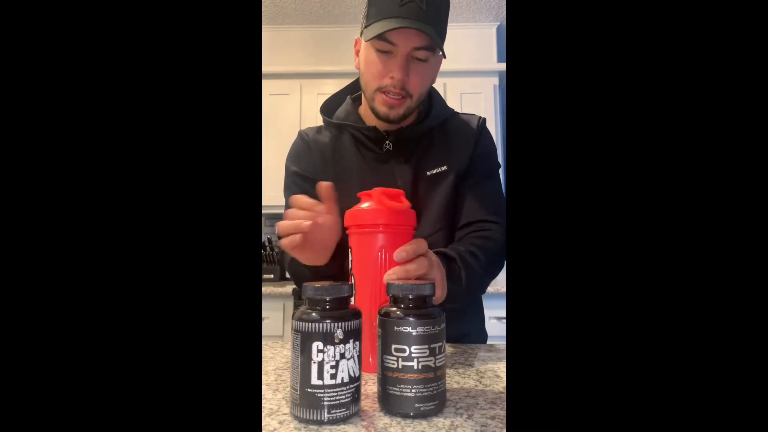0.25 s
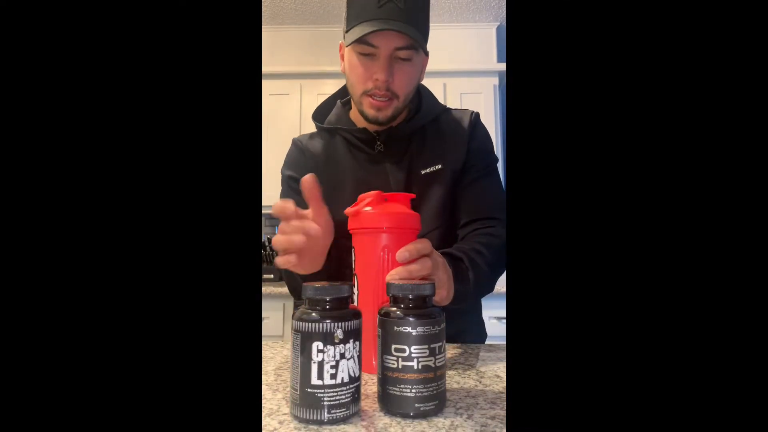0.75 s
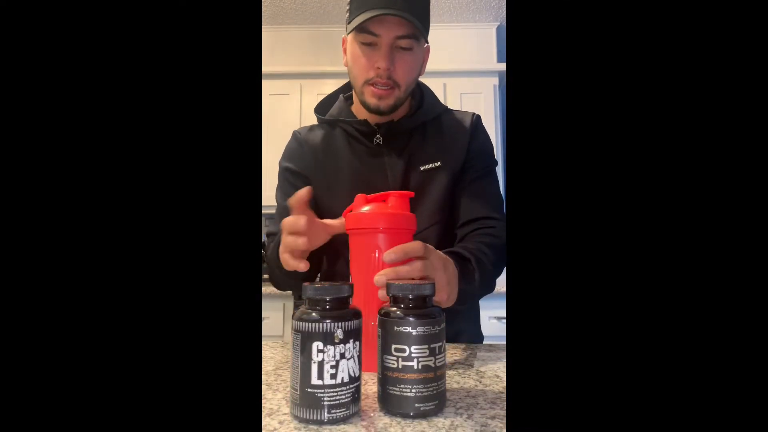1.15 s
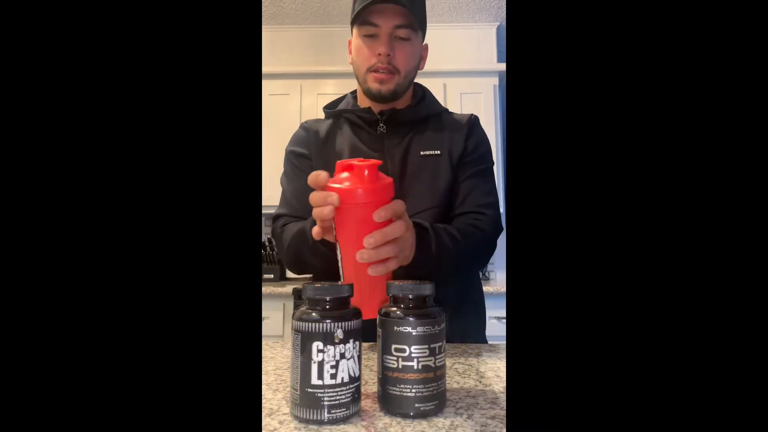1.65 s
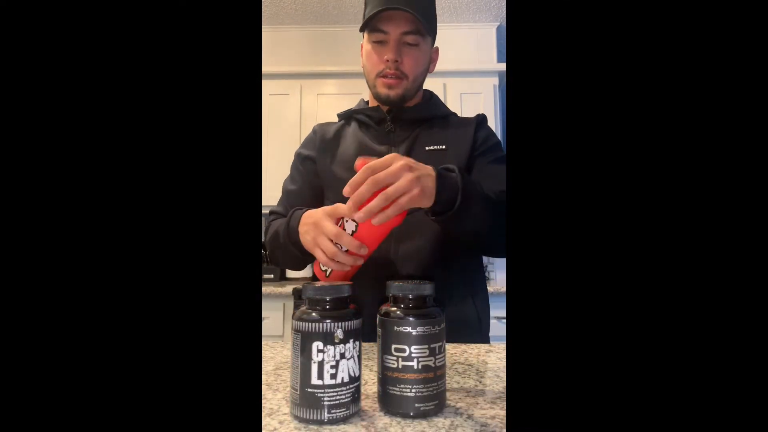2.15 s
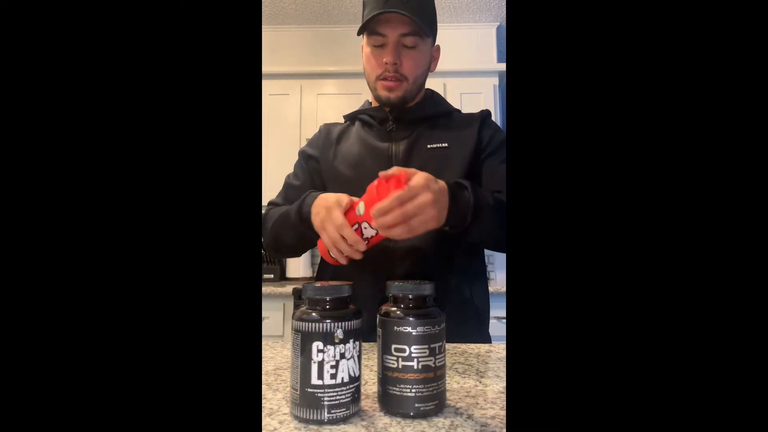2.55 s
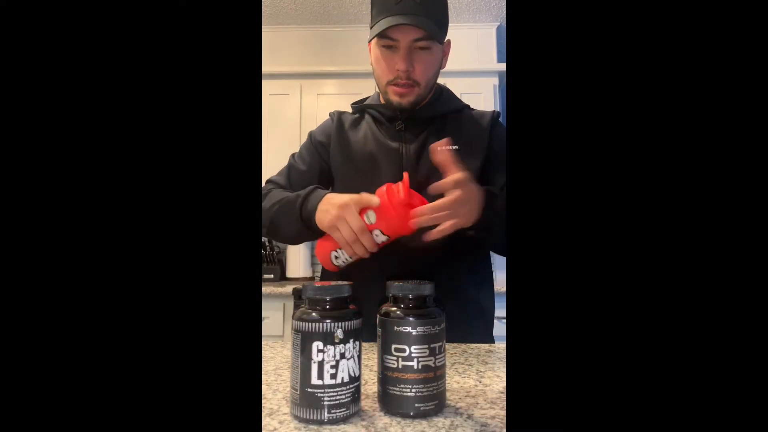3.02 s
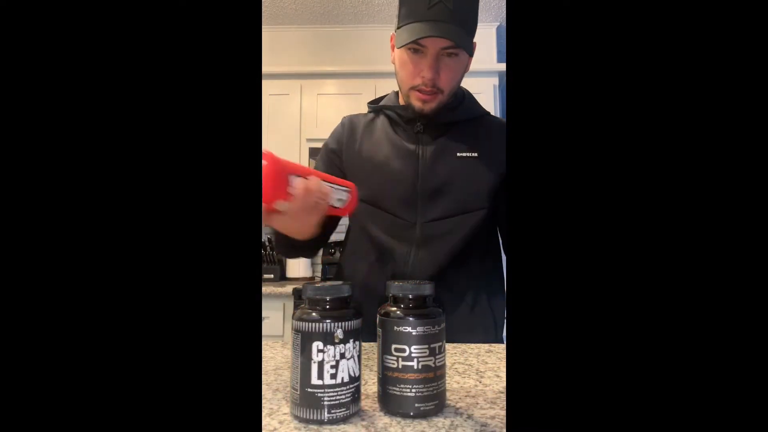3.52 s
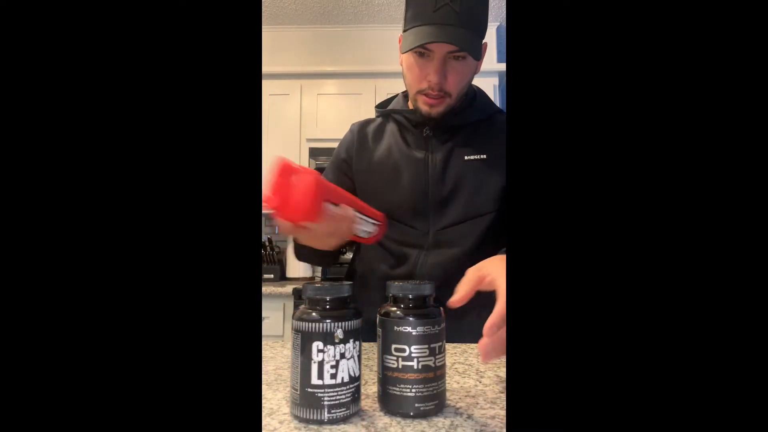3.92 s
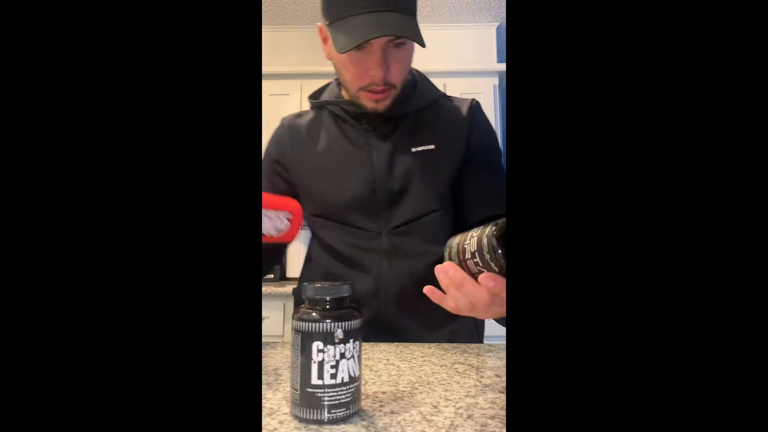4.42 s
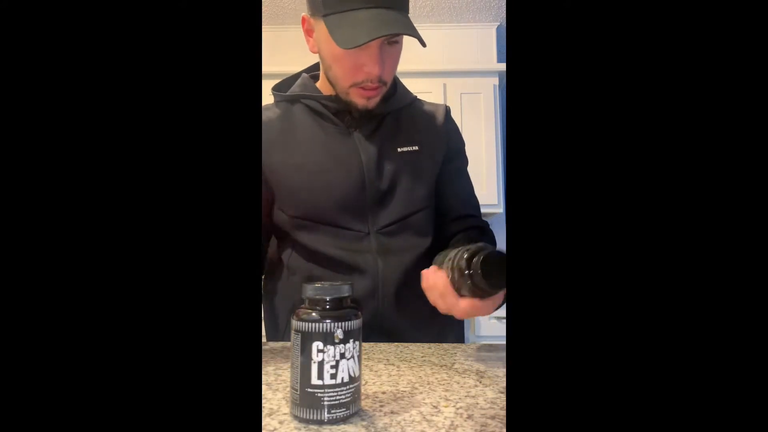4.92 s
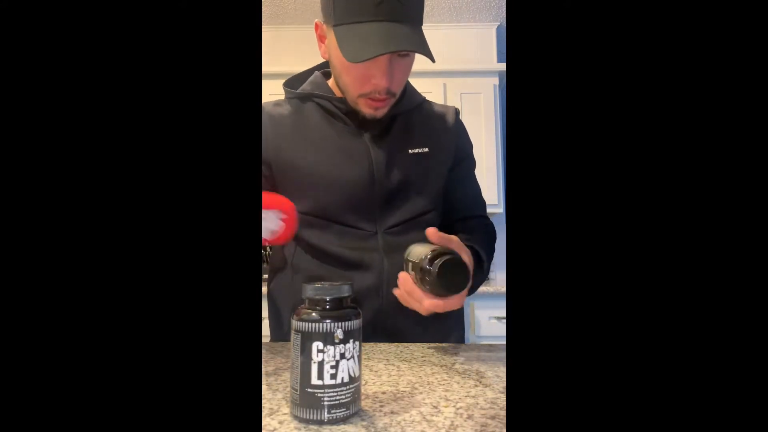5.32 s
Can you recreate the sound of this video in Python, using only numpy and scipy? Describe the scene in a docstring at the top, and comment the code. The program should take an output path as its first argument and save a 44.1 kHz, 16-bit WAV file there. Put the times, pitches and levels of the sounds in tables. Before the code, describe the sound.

In a small kitchen, a plastic cup's lid clicks shut, hands handle it quietly, then it is shaken with watery slosh and sharp rattling knocks.

```python
"""A plastic shaker bottle in a small kitchen, an arm's length from a two-port microphone.
Its lid snaps shut on the counter, fingers tap and hands slide on it, and the cap is pressed once more.
Then it is shaken: water and powder slosh, and something hard, likely the mixing ball, rattles.
Lid, taps and ball are bursts of contacts ringing through plastic resonances; thuds are damped tones.
The liquid is random splashes, bubbles and spray; a fridge hums throughout as shaped noise and tones."""
import sys
import numpy as np
from scipy import signal
from scipy.fft import rfft, irfft, next_fast_len
from scipy.io import wavfile
from scipy.ndimage import uniform_filter1d

SR = 44100
rng = np.random.default_rng(int(sys.argv[2]) if len(sys.argv) > 2 else 0)


def dump(signal):
    """Clip the signal to [-1, 1] and save it as 16-bit WAV at the path in sys.argv[1]."""
    limited = np.clip(np.atleast_2d(signal).T, -1, 1)
    pcm = np.round(limited * 32767).astype(np.int16)
    wavfile.write(sys.argv[1], SR, pcm)


N = 245530

# Levels in the tables are relative: the functions that use them may trim them.
# The ball hitting the cup; rebound_s is the time to its rebound, 0 if it stays:
# start_s, strength_db, hollow_db, tick_db, spot_hz, chatter_s, rebound_s
BALL_KNOCKS = [(3.4179, -21, -37, -29, 1600, 0.0065, 0.002),
               (3.461, -7.5, -28.5, -20, 2700, 0.0063, 0.0039),
               (3.494, -19.5, -37, -17.5, 2350, 0.0061, 0.0025),
               (3.5488, -16, -26.5, -25, 2000, 0.0075, 0.009), (3.661, -11, -24.5, -17, 2880, .012, 0.02),
               (3.7645, -26, -32, -42, 2278, .006, 0.00099), (3.8078, -7, -18, -16, 2400, 0.01, 0.0037),
               (3.882, -14, -35, -21.5, 1780, 0.0095, 0.00017),
               (3.9409, -14, -25, -17.5, 1950, 0.0088, .0065), (3.957, -13, -42, -21, 2370, 0.0074, 0.001),
               (3.982, -18, -49, -44, 2410, 0.0025, 0), (4.012, -20.5, -36, -18.5, 3080, 0.0055, 0),
               (4.1074, -12, -24, -27, 3156, .004, .01), (4.1307, -17, -29, -21.5, 1830, 0.0058, 0),
               (4.1835, -23.5, -55, -36, 2300, 0.0031, 0), (4.2639, -20, -48, -20, 2340, 0.0022, 0.0029),
               (4.3269, -21.5, -38, -21, 1573, 0.0075, 0.016), (4.4101, -21, -33, -26.5, 1774, 0.0074, 0),
               (4.4451, -23, -39, -29, 1720, 0.0035, 0.007),
               (4.5874, -12.5, -28, -20.5, 2550, 0.0079, 0.006),
               (4.6352, -14.5, -24.5, -17, 2350, 0.0068, 0.0096),
               (4.6835, -17, -34, -21.5, 1700, 0.0052, 0), (4.7152, -20, -28.5, -22.5, 1640, 0.0049, 0),
               (4.7407, -12, -22, -20, 3000, 0.0052, .021), (4.8675, -7.5, -27, -10, 2660, 0.0056, 0.0033),
               (4.883, -13.5, -53, -17.5, 2656, .005, 0.0031), (4.9254, -15, -35, -12.5, 1980, .005, 0.003),
               (5.0134, -30, -32, -32, 1816, 0.0043, 0.003), (5.0404, -22, -29, -31, 1590, 0.0059, 0),
               (5.1632, -5, -26, -13.5, 2647, 0.011, 0.0034), (5.2128, -23, -54, -22, 2187, 0.0051, 0),
               (5.3139, -3.5, -19.5, -14, 3280, 0.0026, 0), (5.3178, -8.5, -21, -20, 1716, .003, 0),
               (5.4764, -9, -30.5, -10.5, 1800, 0.0086, 0.01), (5.5466, -15.5, -28, -17.5, 1593, 0.0021, 0)]
# Resonances of the swung cup, against its broad response: pitch_hz, width_hz, level_db
CUP_RESONANCES = [(486, 18, 8), (1150, 79, -7.5), (1790, 300, -2), (2360, 60, -2.5), (2364, 160, 9),
                  (2710, 120, 4.5), (3090, 170, 7), (4120, 440, 8.5)]
# Spectrum of a bright tick: frequency_hz, level_db
TICK_SPECTRUM = [(3000, -16.5), (4700, 10), (6000, 6), (7200, 5.5), (8200, 5), (10500, 3), (13000, 1.5),
                 (15200, 8), (16000, -3)]

LEAD_S = 0.02  # a strike begins this long before its hard contact
SHAKE_START_S = 3.28


def gain_of(db):
    """Decibels to amplitude."""
    return 10 ** (np.asarray(db) / 20)


def evened(x):
    """Scales to unit rms."""
    return x / np.sqrt(np.mean(x ** 2) + 1e-20)


def read(points, hz):
    """Reads a table on a log-frequency axis."""
    f, value = np.transpose(points)
    return np.interp(np.log(hz + 1), np.log(f + 1), value)


def level(rows):
    """A (second, dB) curve as a gain for every sample."""
    seconds, db = np.transpose(rows)
    return gain_of(np.interp(np.arange(N) / SR, seconds, db))


def add(mix, s, sound):
    """Mixes a sound in at time s."""
    part = mix[max(round(s * SR), 0):][:len(sound)]
    part += sound[:len(part)]


def band(x, lo_hz, hi_hz, order=3):
    """Causal band-pass."""
    return signal.sosfilt(signal.butter(order, [lo_hz, hi_hz], "band", fs=SR, output="sos"), x)


def colour(x, spectrum, size=4096):
    """Causal minimum-phase filter with the given spectrum."""
    hz = abs(np.fft.fftfreq(size, 1 / SR))
    log_gain = np.log(gain_of(read(spectrum, hz)))
    response = np.exp(np.conj(signal.hilbert(log_gain)))
    taps = np.fft.ifft(response).real[:size // 2]
    return signal.fftconvolve(x, taps)[:len(x)]


def ring(x, modes):
    """A plastic body: a broad response plus resonances of given pitch, width and level."""
    size = next_fast_len(len(x) + SR // 10)
    f = np.fft.rfftfreq(size, 1 / SR)
    body = 1 + sum(gain_of(db) / (1 + 2j * (f - hz) / width) for hz, width, db in modes)
    return irfft(rfft(x, size) * body, size)[:len(x)]


def varied(modes, detune):
    """Water and grip lie differently at every blow, shifting each resonance in pitch and strength."""
    chance = rng.standard_normal((len(modes), 2))
    return [(hz * (1 + detune * shift), width, db + 3 * boost)
            for (hz, width, db), (shift, boost) in zip(modes, chance)]


def crackle(count, per_s, spread_db):
    """A random train of tiny contacts of uneven size, over count samples."""
    size = gain_of(spread_db * np.minimum(rng.exponential(1, count), 4))
    sign = rng.choice([-1, 1], count)
    return size * sign * (rng.random(count) < per_s / SR)


def lumps(per_s, depth_db):
    """A gain that wanders at random, with about per_s random levels a second."""
    at = np.cumsum(rng.uniform(.3, 1.7, 1000)) / per_s
    wander = np.interp(np.arange(N) / SR, at, rng.standard_normal(len(at)))
    return evened(gain_of(depth_db * wander))


def peaked(x, db, size=128):
    """Sets the rms of the loudest stretch of size samples (three milliseconds by default)."""
    return gain_of(db) * x / np.sqrt(uniform_filter1d(x ** 2, size).max() + 1e-20)


def strike(modes, wall_db, hollow_db, tick_db, chatter_s, first_db, scrape_s, scrape_db, after_db, after_s):
    """A scrape, a hard contact and its dying chatter sound the wall, the hollow inside and a bright tick."""
    t = np.arange(SR // 5) / SR - LEAD_S
    contacts = evened(crackle(len(t), per_s=2300, spread_db=1.24))
    contacts[round(LEAD_S * SR)] = gain_of(first_db)

    scrape = gain_of(scrape_db) * np.exp(-abs(t) / scrape_s)
    blow = np.where(t < 0, scrape, np.exp(-abs(t) / chatter_s))
    aftermath = gain_of(after_db) * np.clip(t / 0.017, 0, 1) * np.exp(-abs(t) / after_s)
    body = ring(contacts * (blow + aftermath), modes)
    wall = peaked(band(body, 1440, 3770), wall_db)
    hollow = peaked(band(body, 288, 1380), hollow_db)

    sharp = np.where(t < 0, .5 * scrape, np.exp(-abs(t) / (0.76 * chatter_s)))  # the treble dies first
    tick = peaked(colour(contacts * (sharp + 0.14 * aftermath), TICK_SPECTRUM), tick_db)
    return wall + hollow + tick


def thud(db, hz, decay_s, stiffening=0.0):
    """A damped ring with a shudder around it; stiffening starts it higher, while pressed hard."""
    t = np.arange(SR // 4) / SR
    shudder = evened(band(rng.standard_normal(len(t)), hz * 0.54, hz * 1.53))
    turns = np.cumsum(hz * (1 + stiffening * np.exp(-t / 0.0054))) / SR
    onset = np.clip(t / 0.00094, 0, 1)
    push = (np.sin(2 * np.pi * turns) + 0.61 * shudder) * onset
    return peaked(push * np.exp(-t / decay_s), db, size=400)


def fridge():
    """Low machine noise, less alike in the two channels toward the treble, and a wavering hum."""
    # Spectrum of the machine noise: frequency_hz, level_db
    room_tone = [(25, -27.5), (39, -17.5), (62, 1), (100, -2.5), (160, 1.5), (250, -2), (400, -8),
                 (630, -14), (1000, -23), (2500, -29), (5000, -42.5), (8000, -60), (16000, -50.5)]
    # Tones of the hum: pitch_hz, level_db
    hum_tones = [(118.4, -44.5), (177.6, -47.5), (312.2, -54.5), (366.1, -51)]
    t = np.arange(N) / SR
    air, left, right = (evened(colour(rng.standard_normal(N), room_tone)) for _ in range(3))
    apart = band(np.array([left, right]), 630, 12970, order=1)
    hum = np.zeros(N)
    for hz, db in hum_tones:
        waver = np.interp(t, np.linspace(0, t[-1], 40), rng.standard_normal(40))
        hum += gain_of(db) * np.sqrt(2) * np.sin(2 * np.pi * hz * t + 0.51 * waver)
    return gain_of(-40.5) * (air + apart) + gain_of(-1.5) * hum


def rub():
    """Skin and sleeves catch and slide on the plastic in short strokes."""
    # Hands sliding over the cup, length between the 1/e points: middle_s, length_s, rub_db, hiss_db
    rubs = [(0.092, 0.14, -45.5, -50.5), (0.585, 0.22, -59, -53.5), (1.424, 0.19, -48.5, -53),
            (1.688, 0.17, -59, -66), (2.065, 0.078, -48.5, -63.5), (2.38, 0.037, -60, -62),
            (2.62, 0.29, -48.5, -59), (2.896, 0.12, -47, -65), (3.124, 0.24, -43.5, -66)]
    # Spectrum of skin on plastic: frequency_hz, level_db
    skin_spectrum = [(400, -5), (1000, 2.5), (2500, 6), (4000, 0.5), (6000, -0.5), (10000, -78),
                     (15000, 5.5)]
    t = np.arange(N) / SR
    slips = crackle(N, per_s=790, spread_db=2.0) * lumps(per_s=79, depth_db=6.5)
    body = evened(ring(colour(slips, skin_spectrum), CUP_RESONANCES))
    hiss = evened(colour(slips, TICK_SPECTRUM))
    out = np.zeros(N)
    for s, length_s, rub_db, hiss_db in rubs:
        stroke = np.exp(-(2 * (t - s) / length_s) ** 2)
        out += stroke * (gain_of(rub_db) * body + gain_of(hiss_db) * hiss)
    return out


def lid():
    """The lid strains and snaps; in the hand it rings less."""
    # Lid catches and snaps: start_s, wall_db, hollow_db, tick_db, chatter_s
    snaps = [(0.0511, -31.5, -31, -39, 0.0092), (0.0873, -23, -32.5, -44, 0.0035),
             (0.3643, -29, -23.5, -31, 0.006), (0.3676, -5.5, -21.5, -14, 0.0024),
             (0.484, -23, -41, -32, 0.0024), (0.7715, -28, -40, -38, 0.0055),
             (0.776, -14, -19.5, -25.5, 0.0013), (0.8575, -20, -24, -29.5, 0.0021),
             (0.8929, -33, -37, -60, 0.0032), (2.9935, -14.5, -37, -22, 0.0023),
             (2.997, -14, -23.5, -15.5, 0.011), (3.0585, -18.5, -28, -19.5, 0.012)]
    # Resonances of the closed lid, against its broad response: pitch_hz, width_hz, level_db
    lid_resonances = [(680, 40, 4), (820, 63, 22), (1000, 46, 8), (1143, 110, 6.5), (1590, 60, 2),
                      (1906, 52, 8.5), (2265, 33, 13), (2370, 120, 14), (2670, 97, 13), (3150, 150, 5),
                      (3760, 150, 8), (4180, 112, 9.5)]
    lift_s = 1.5  # the cup has left the counter
    grip_keeps = 0.083  # share of each resonance's dB that the grip leaves
    out = np.zeros(N)
    for s, wall_db, hollow_db, tick_db, chatter_s in snaps:
        keeps = grip_keeps if s > lift_s else 1
        modes = [(hz, width, keeps * db) for hz, width, db in lid_resonances]
        snap = strike(modes, wall_db - 7.5, hollow_db - 0.5, tick_db - 6.0, chatter_s, first_db=14,
                      scrape_s=0.004, scrape_db=-9, after_db=-26, after_s=0.024)
        add(out, s - LEAD_S, snap)
    return out


def bumps():
    """The cup thuds and the air under the lid pops; on the counter, the counter booms under it."""
    # The cup pushed by the hand: start_s, thud_db, thud_hz, pop_db, pop_hz
    pushes = [(0.056, -30.5, 162, -42, 347), (0.091, -28, 143, -58, 350), (0.3718, -19.5, 166, -23, 282),
              (0.78, -22.5, 127, -26, 337), (0.796, -20.5, 126, -44, 320), (0.859, -16, 163, -31, 290),
              (0.895, -22.5, 149, -31, 326), (2.999, -23.5, 190, -17.5, 339), (3.059, -42, 140, -36, 543)]
    # The counter under the cup: start_s, level_db
    counter_booms = [(0.373, -38), (0.784, -25), (0.86, -23), (0.9, -38.5)]
    out = np.zeros(N)
    for s, thud_db, thud_hz, pop_db, pop_hz in pushes:
        add(out, s, thud(thud_db, thud_hz, decay_s=0.0084, stiffening=0.21))
        add(out, s, thud(pop_db, pop_hz, decay_s=0.0057, stiffening=0.1))
    for s, db in counter_booms:
        add(out, s, thud(db, hz=78, decay_s=0.018))
    return band(out, 52, 3000, order=2)


def fingers():
    """Light taps as the grip changes; the side wall gives with a soft ring at the touched spot."""
    # Fingers on the plastic, with the pitch of the touched spot: start_s, strength_db, tick_db, spot_hz
    taps = [(0.5007, -28.5, -46, 2420), (1.183, -36.5, -67, 1315), (1.342, -25, -40.5, 2490),
            (1.4332, -24, -40, 1980), (1.6373, -36, -63, 2360), (1.725, -23.5, -43, 2570),
            (1.758, -32, -51, 2380), (2.4364, -25, -38, 2220), (2.5088, -23.5, -35.5, 1286),
            (2.5481, -29.5, -43, 2400), (2.617, -32.5, -57, 2050), (2.67, -37, -48.5, 1330),
            (2.8625, -31.5, -47, 2300), (2.9182, -36, -40.5, 2350), (3.2875, -17, -46, 2290),
            (3.329, -19.5, -29.5, 1730)]
    out = np.zeros(N)
    for s, db, tick_db, spot_hz in taps:
        modes = varied(CUP_RESONANCES, detune=0.024)
        tap = strike(modes, db - 8.5, db - 15, tick_db, chatter_s=0.0028, first_db=14.5,
                     scrape_s=0.0021, scrape_db=-16, after_db=-9, after_s=0.026)
        add(out, s - LEAD_S, tap)
        give_db = db - 11.0 - 20 * np.log10(spot_hz / 1700)  # higher spots give less
        add(out, s, thud(give_db, spot_hz, decay_s=0.0068))
    return out


def bubbles(per_s, spread_db, cycles, rise, count=40):
    """Air pockets of many sizes ring briefly, rising in pitch; the small ones are the most common."""
    out = np.zeros(N)
    pitches = np.geomspace(400, 3600, count)
    for hz in pitches:
        age = np.arange(int(4 * cycles / hz * SR)) * hz / (cycles * SR)  # in decay times
        pop = np.exp(-age) * np.sin(2 * np.pi * cycles * age * (1 + rise * age))
        births = crackle(N, per_s * hz / pitches.sum(), spread_db)
        out += signal.oaconvolve(births, pop)[:N] * hz ** 0.74
    return evened(out)


def slosh():
    """Clumped splashes and bubbles through the cup, with a spray of drops and powder; knocks bring surges."""
    # Vigour of the shaking: time_s, level_db of the churning liquid
    vigour = [(3.36, -39.5), (3.5, -34), (3.9, -32.5), (4.08, -33.5), (4.18, -34.5), (4.38, -36.5),
              (4.8, -37.5), (5.05, -38), (5.38, -35), (5.45, -42), (5.57, -34)]
    # Spectrum of the splashes: frequency_hz, level_db
    liquid_spectrum = [(150, -25), (350, -8.5), (900, -7.5), (1600, 4.5), (2600, -2), (3600, -7),
                       (4700, -2), (6000, 1), (12000, -34)]
    surge_db, surge_delay_s, surge_width_s = -41.5, 0.1, 0.055  # water arrives behind the ball
    spray_db, spray_follow = -6, 0.97  # spray at full vigour; its share of the liquid's dB swings
    t = np.arange(N) / SR

    splashes = evened(ring(colour(crackle(N, per_s=300, spread_db=1.5), liquid_spectrum), CUP_RESONANCES))
    splashes = splashes * lumps(per_s=25, depth_db=3.0)
    froth = gain_of(-1.5) * bubbles(per_s=380, spread_db=0.5, cycles=10.8, rise=0.0231)
    liquid = evened((splashes + froth) * lumps(per_s=65, depth_db=3.0))
    spray = evened(colour(crackle(N, per_s=860, spread_db=1.0), TICK_SPECTRUM))
    spray = spray * lumps(per_s=66, depth_db=4.0)

    surges = np.zeros(N)
    for s, db, *_ in BALL_KNOCKS:
        surges += gain_of(db + surge_db) * np.exp(-((t - s - surge_delay_s) / surge_width_s) ** 2)
    churn = np.hypot(level(vigour), surges)
    mist = gain_of(spray_db) * churn.max() * (churn / churn.max()) ** spray_follow
    shaken = np.clip((t - SHAKE_START_S) / 0.17, 0, 1)
    return shaken * (gain_of(-1.5) * churn * liquid + mist * spray)


def drops():
    """Single dry ticks with a very short, high ring."""
    # Sharp little ticks, likely drops flung at the wall: start_s, level_db
    flung_drops = [(3.378, -37), (3.389, -38), (3.398, -38), (3.406, -27), (3.725, -31), (4.066, -50),
                   (4.118, -38), (4.138, -40), (4.2357, -30), (4.316, -31), (4.367, -36), (4.4793, -39),
                   (4.6358, -14), (4.7108, -28), (4.823, -23), (5.006, -24), (5.059, -32), (5.2643, -32),
                   (5.349, -26), (5.5632, -29)]
    out = np.zeros(N)
    t = np.arange(SR // 40) / SR
    for s, db in flung_drops:
        spatter = evened(colour(rng.standard_normal(len(t)), TICK_SPECTRUM))
        pitch_hz = 6800 * rng.uniform(.92, 1.08)
        tick = np.sin(2 * np.pi * pitch_hz * t) + 0.8 * spatter
        add(out, s, peaked(tick * np.exp(-t / 0.0009), db))
    return out


def knock(db, hollow_db, tick_db, spot_hz, chatter_s, splash_db):
    """The ball meets one spot of the wall, which adds its own resonance, with a splash after it."""
    modes = varied(CUP_RESONANCES, detune=0.011) + [(spot_hz, 280, 13)]
    return strike(modes, db - 8.0, hollow_db, tick_db - 3.5, chatter_s, first_db=15.5,
                  scrape_s=0.0039, scrape_db=-8.0, after_db=splash_db, after_s=0.044)


def rattle():
    """The ball lands on the cup and often rebounds; water slaps the end of the cup and splashes."""
    usual_db, splash_usual_db = -10, -11.5  # a usual knock, and its splash as the shaking starts
    splash_lag = 0.14  # a stronger knock loses this share of its extra dB from the relative splash
    drying_db_per_s, slap_rise_hz_per_s = 2.5, 60  # later knocks are drier, later slaps higher
    rebound_db = -2.5  # a rebound is weaker
    out = np.zeros(N)
    for s, db, hollow_db, tick_db, spot_hz, chatter_s, rebound_s in BALL_KNOCKS:
        shaken_s = s - SHAKE_START_S
        splash_db = splash_usual_db - splash_lag * (db - usual_db) - drying_db_per_s * shaken_s
        add(out, s - LEAD_S, knock(db, hollow_db - 1.5, tick_db, spot_hz, chatter_s, splash_db))
        slap = thud(hollow_db - 10, 442 + slap_rise_hz_per_s * shaken_s, decay_s=0.0075)
        add(out, s + 0.002026, slap)
        if rebound_s > 0:
            rebound = knock(db + rebound_db, db - 29.5, tick_db + rebound_db, spot_hz,
                            chatter_s=0.0035, splash_db=splash_db)
            add(out, s + rebound_s - LEAD_S, rebound)
    return out


def grazes(count=44):
    """Faint, short chance contacts of the tumbling ball, each with a small splash."""
    per_s = 17
    first_s = BALL_KNOCKS[0][0]
    out = np.zeros(N)
    for k, (when, force, spot) in enumerate(rng.random((count, 3))):
        db = -34.5 - 3.5 * (2 * force - 1)
        graze = knock(db, db - 5, db - 1, 1500 * 2 ** spot, chatter_s=0.0038, splash_db=-10)
        add(out, first_s + (k + when) / per_s - LEAD_S, graze)
    return out


def kitchen(x, spread_db, early_db):
    """Echoes from counter and cupboards, then a diffuse tail; returns left and right."""
    # Reverberation time of the room: frequency_hz, t60_s
    reverb_times = [(150, .36), (500, .4), (1400, .46), (3600, .42), (9000, .36), (15000, .3)]
    taps = np.array([crackle(SR // 2, per_s=2700, spread_db=-0.5) for _ in range(2)])
    hz, t, z = signal.stft(taps, SR, nperseg=256)
    fade = gain_of(-60 * t / read(reverb_times, hz)[:, None])
    early = 1 + gain_of(early_db) * np.exp(-t / 0.0093)
    onset = np.clip(t / 0.0027, 0, 1)
    tails = signal.istft(z * fade * early * onset, SR, nperseg=256)[1]
    mid, side = (signal.fftconvolve(x, tail / np.linalg.norm(tail))[:N] for tail in tails)
    side = gain_of(spread_db) * band(side, 660, 2130, order=1)
    return np.array([mid + side, mid - side])


def scene():
    """Everything happens an arm's length from the microphone: direct sound, its room, and the fridge."""
    held = lid() + fingers() + rub()
    low = bumps()
    shaken = rattle() + grazes() + slosh() + drops()
    held_room = gain_of(-3.5) * kitchen(held, spread_db=0.0, early_db=8.5)
    low_room = gain_of(-4.0) * kitchen(low, spread_db=1.5, early_db=-36.0)
    shaken_room = gain_of(-7.5) * kitchen(shaken, spread_db=3.0, early_db=15.5)
    return held + low + shaken + held_room + low_room + shaken_room + fridge()


def record(dry):
    """Two microphone ports a little apart, a soft overload on the hardest peaks, then the band limits."""
    # How far the left microphone port leads the right: frequency_hz, phase_rad
    port_phase = [(0, 0), (1600, -.2), (3300, .6), (4750, 3.14), (6400, 5.9), (7400, 6.6), (8950, 9.42),
                  (10500, 12.2), (11600, 12.8), (13150, 15.7), (15000, 18.6), (17000, 18.9)]
    ceiling = 0.8  # of full scale
    size = next_fast_len(N + SR // 10)
    lead = np.interp(np.fft.rfftfreq(size, 1 / SR), *np.transpose(port_phase))
    turn = np.exp(.5j * np.array([lead, -lead]))
    pair = irfft(rfft(dry, size) * turn, size)[:, :N]
    pair = pair / (1 + (pair / ceiling) ** 6) ** (1 / 6)
    pair = signal.sosfilt(signal.butter(3, 40, "high", fs=SR, output="sos"), pair)
    treble_limit = signal.firwin(511, 15850, window=("kaiser", 9), fs=SR)
    return signal.oaconvolve(pair, treble_limit[None], "same")


dry = scene()
out = record(dry)
dump(out)
```